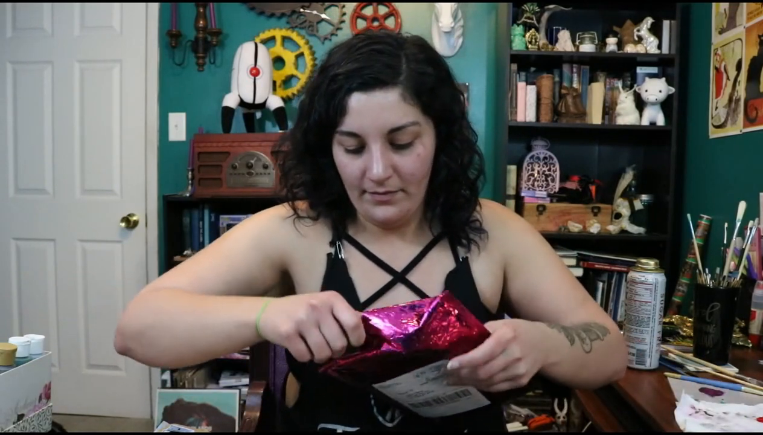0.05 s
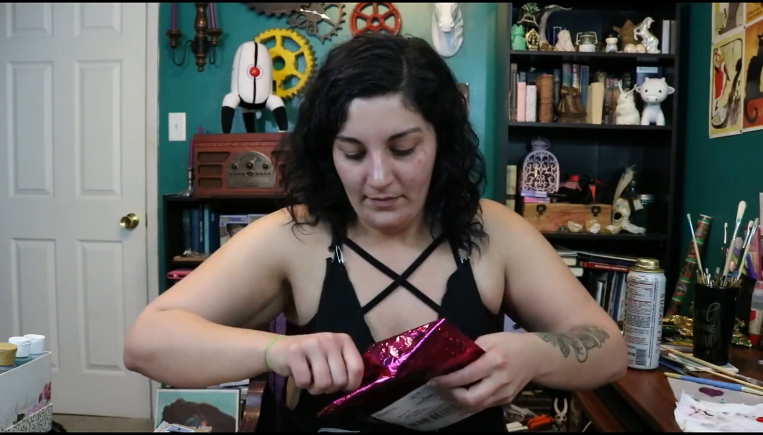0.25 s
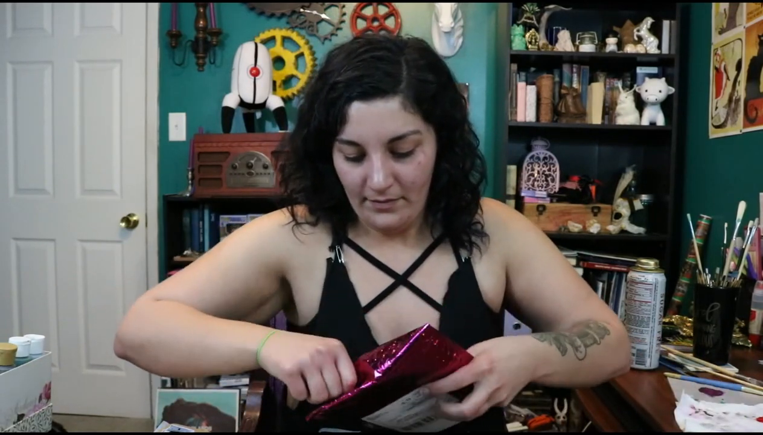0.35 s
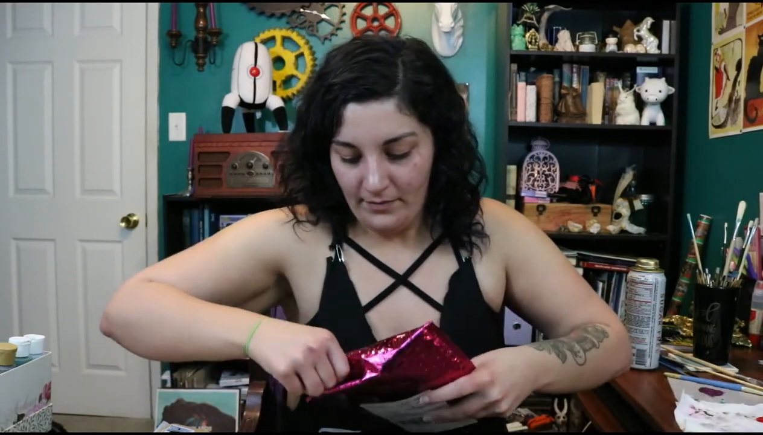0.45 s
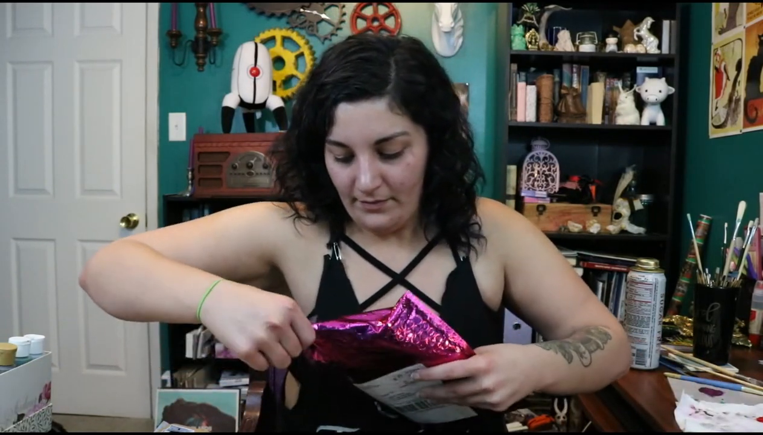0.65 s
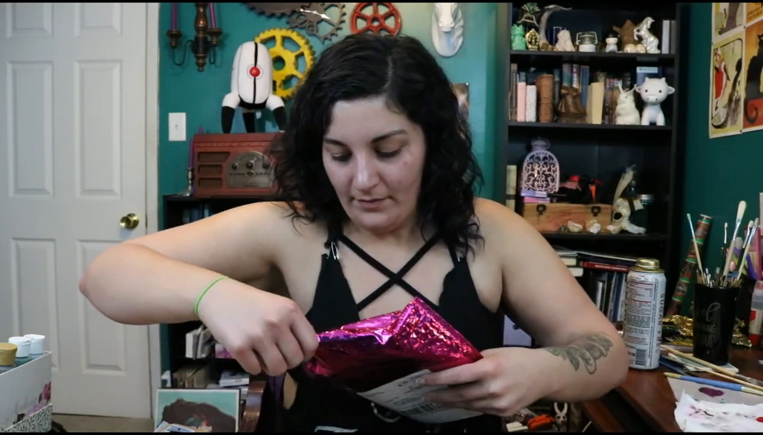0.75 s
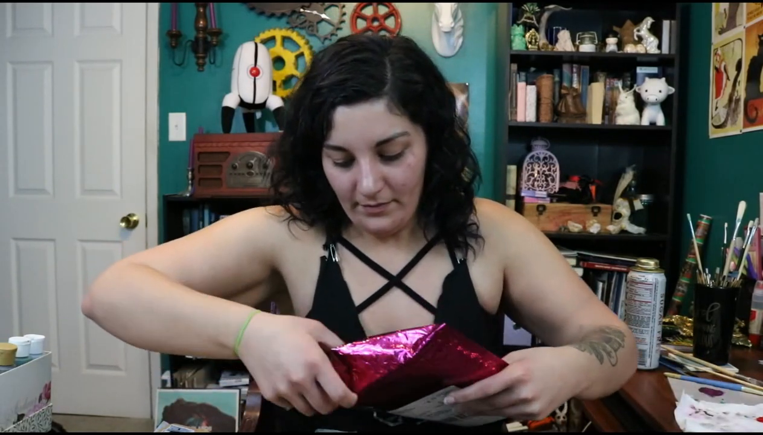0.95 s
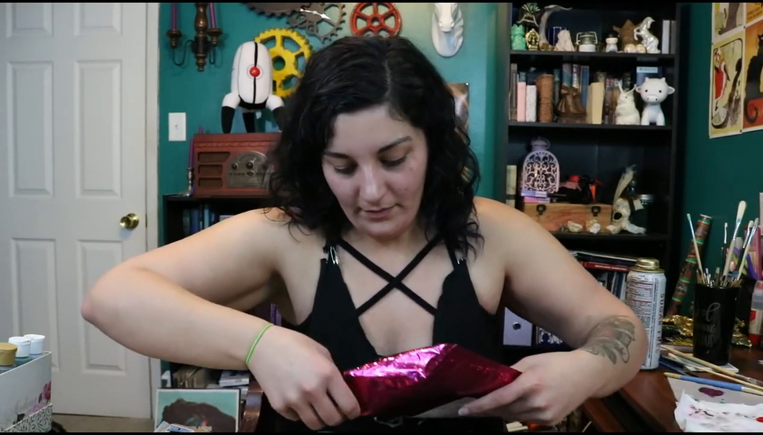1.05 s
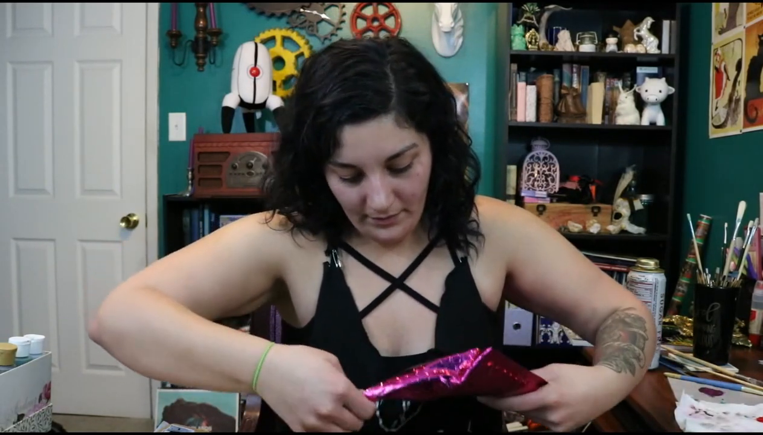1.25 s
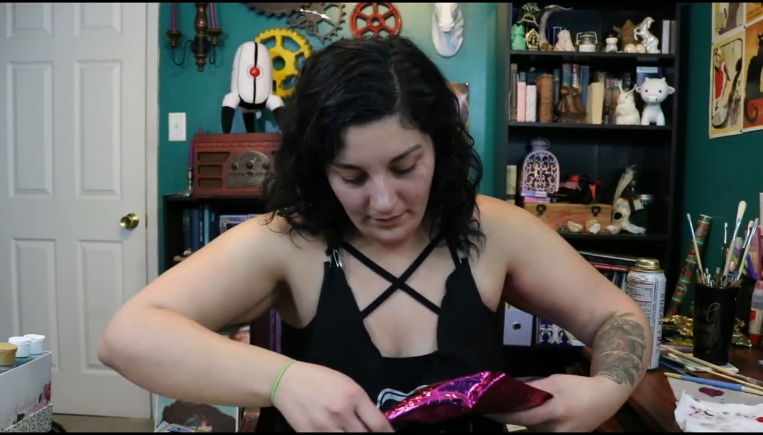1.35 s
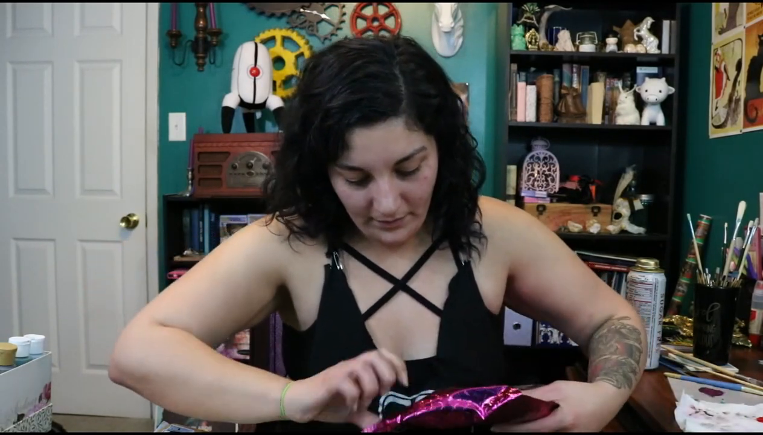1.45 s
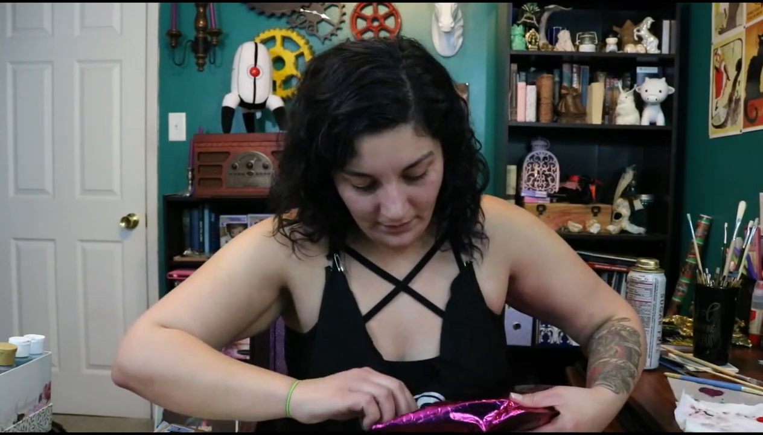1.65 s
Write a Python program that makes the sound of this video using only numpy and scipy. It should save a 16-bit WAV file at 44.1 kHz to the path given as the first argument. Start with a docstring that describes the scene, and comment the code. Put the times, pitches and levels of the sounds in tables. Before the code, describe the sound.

A foil plastic bag crinkles as hands pull it open, with sharp snaps and soft hollow thumps. One hard tug crackles loudest and rings briefly, then lighter crinkling follows, about a metre away in a small quiet room.

```python
"""Tugging open a foil mailer

A foil-coated plastic bag is pulled open by hand, about a metre away in a small room, in stereo.
Creases buckle with sharp snaps over a crinkle of countless tiny ones that follows the hands' effort.
The flexing bag gives soft hollow thumps, and the hardest tug leaves a short ring."""
import sys
import numpy as np
from scipy import signal
from scipy.fft import rfft, irfft, next_fast_len
from scipy.io import wavfile

SR = 44100
rng = np.random.default_rng(int(sys.argv[2]) if len(sys.argv) > 2 else 0)


def waveform_to_disk(signal):
    """Save audio, clipped to [-1, 1], as 16-bit WAV at the path in sys.argv[1]."""
    frames = np.transpose(np.atleast_2d(signal))
    scaled = np.clip(frames, -1, 1) * 32767
    samples = np.round(scaled).astype(np.int16)
    wavfile.write(sys.argv[1], SR, samples)


N = 74970


def amp(db):
    return 10 ** (np.asarray(db) / 20)


def unit_rms(x):
    return x / np.sqrt(np.mean(x ** 2) + 1e-20)


def along(points, hz):
    """Interpolate (Hz, value) points on a log-frequency axis."""
    points_hz, values = np.transpose(points)
    return np.interp(np.log(hz + 1), np.log(points_hz + 1), values)


def band(hz, centre_hz, octaves):
    """Bell on the log-frequency axis."""
    return np.exp(-(np.log2((hz + 1) / centre_hz) / (2 * octaves)) ** 2)


def filtered(x, response):
    """Zero-phase filter with gain response(hz)."""
    n = x.shape[-1]
    size = next_fast_len(n + SR // 4)
    return irfft(rfft(x, size) * response(np.fft.rfftfreq(size, 1 / SR)), size)[..., :n]


def add(out, start_s, x):
    """Mix x into out from start_s."""
    i = max(0, round(start_s * SR))
    n = max(0, min(x.shape[-1], N - i))
    out[..., i:i + n] += x[..., :n]


def pulse(gain, size=1024):
    """Minimum-phase click with spectrum gain(hz)."""
    cepstrum = irfft(np.log(np.maximum(gain(np.fft.rfftfreq(size, 1 / SR)), 1e-4)))
    cepstrum[1:size // 2] *= 2
    cepstrum[size // 2 + 1:] = 0
    return irfft(np.exp(rfft(cepstrum)))


def diffuse_field(noise_pair):
    """Two independent noises become the room's field at two microphones."""
    # Each row: frequency in Hz, left-right correlation.
    coherence = [(100, 0.77), (300, 0.79), (500, 0.97), (900, 0.1), (2000, -0.2), (4000, -0.17),
                 (10000, -0.06)]

    def mid_side_gains(hz):
        angle = np.arccos(np.clip(along(coherence, hz), -1, 1)) / 2
        return np.array([np.cos(angle), np.sin(angle)])

    mid, side = filtered(noise_pair, mid_side_gains)
    return np.array([mid + side, mid - side])


def in_room(x, wet_db=-2, onset_s=0.0017):
    """A short stereo sound plus its own diffuse tail."""
    # Room decay. Each row: frequency in Hz, T60 in seconds.
    t60_s = [(150, 0.45), (450, 0.38), (900, 0.34), (2000, 0.36), (6000, 0.34), (14000, 0.22)]
    hz, t, spectra = signal.stft(rng.standard_normal((2, SR // 2)), SR, nperseg=256)
    decay = amp(-60 * t / along(t60_s, hz)[:, None])
    tail = diffuse_field(signal.istft(spectra * decay, SR, nperseg=256)[1])
    tail *= 1 - np.exp(-(np.arange(tail.shape[1]) / SR / onset_s) ** 2)
    out = signal.fftconvolve(x, tail, axes=1)
    out *= amp(wet_db) * np.linalg.norm(x) / (np.linalg.norm(out) + 1e-12)
    out[:, :x.shape[1]] += x
    return out


def room_tone(rms_db=-53.5):
    """Faint steady air of the room."""
    # Each row: frequency in Hz, relative spectral density in dB.
    spectrum = [(25, -19), (60, -3.5), (90, -9), (135, 1), (200, -3.5), (400, -4.5), (1000, -11),
                (4000, -21.5), (16000, -36)]
    air = diffuse_field(rng.standard_normal((2, N)))
    return amp(rms_db) * unit_rms(filtered(air, lambda hz: amp(along(spectrum, hz))))


def ring(tug_s=0.581, rise_s=0.012, waver_depth=0.18, waver_hz=30):
    """The hardest tug rings the bag; its modes waver as it changes shape."""
    # Each row: mode frequency in Hz, level in dB, T60 in seconds.
    modes = [(415, -30, 0.19), (567, -16.5, 0.34), (673, -36, 0.52), (784.4, -15.5, 0.13), (967, -31, 0.28),
             (1368, -27, 0.31), (1624, -35, 0.28)]
    out, t = np.zeros((2, N)), np.arange(SR // 2) / SR

    def waver():
        drift = filtered(rng.standard_normal(len(t)), lambda hz: np.exp(-(hz / waver_hz) ** 2))
        return waver_depth * unit_rms(drift)

    note = np.zeros(len(t))
    for mode_hz, level_db, t60_s in modes:
        envelope = amp(level_db - 60 * t / t60_s) * (1 + waver())
        note += envelope * np.sin(2 * np.pi * (mode_hz * t + rng.random()) + waver())
    add(out, tug_s, note * (1 - np.exp(-t / rise_s)))
    return out


def thumps(rise_s=0.004, t60_s=0.03, roughness=0.81, trim_db=-1):
    """A whole panel of the bag flips over unevenly and pushes the air inside."""
    # Each row: start in seconds, level in dB, pitch in Hz.
    flips = [(.051, -24.5, 540), (.091, -26, 457), (.12, -25, 484), (.15, -30, 528), (.221, -24.5, 461),
             (.27, -32, 493), (.358, -30, 521), (.39, -29, 490), (.512, -27.5, 530), (.606, -28, 433),
             (.887, -27.5, 560), (.922, -28.5, 506), (.937, -23.5, 487.4), (1.022, -29.5, 550),
             (1.09, -32.5, 413), (1.121, -25, 511), (1.131, -33, 298), (1.143, -23, 517), (1.18, -35, 537),
             (1.365, -34, 523), (1.407, -21, 476), (1.467, -31, 550), (1.537, -31, 530),
             (1.675, -36.5, 460)]
    # Two broad resonances of the hollow bag. Each row: frequency in Hz, gain in dB.
    cavity = [(280, -2), (415, 1), (475, -2.5), (545, 2), (600, -1), (690, -5.5)]
    out, t = np.zeros((2, N)), np.arange(SR // 10) / SR
    envelope = (1 - np.exp(-t / rise_s)) * amp(-60 * t / t60_s)
    for start_s, level_db, pitch_hz in flips:
        uneven = filtered(rng.standard_normal(len(t)), lambda hz: band(hz, pitch_hz, octaves=0.2))
        push = envelope * (np.sin(2 * np.pi * pitch_hz * t) + roughness * unit_rms(uneven))
        push *= amp(level_db + trim_db) / np.abs(push).max()
        add(out, start_s, in_room(np.array([push, push]), wet_db=-3))
    return filtered(out, lambda hz: amp(along(cavity, hz)))


def crinkle(ref_hz=3000, ref_pops_per_s=1100, size_spread_db=5, ref_pan_spread_db=10):
    """Tiny creases pop at random: louder, denser and brighter as the hands press."""
    # Hand effort. Each row: time in seconds, level in dB, base tilt in dB per octave.
    hands = [(0, -39, -2), (.045, -39, 0.5), (.09, -31, -0.5), (.13, -35, -0.5), (0.198, -39, 2),
             (0.269, -36, -1.5), (.32, -40.5, 4), (0.389, -32, -0.5), (.44, -36, 2), (.5, -33, 0.5),
             (.53, -27.5, -1.5), (.548, -20.5, 0.5), (0.579, -22.5, -0.9), (0.609, -20, 0.5),
             (.635, -35, -0.5), (0.704, -30.5, -1.5), (0.746, -45, -2.5), (.8, -44, -1), (.865, -42, -1),
             (.905, -36, -2.5), (.955, -34, 0.5), (1.009, -41.5, -0.5), (1.065, -42, 0),
             (1.125, -31.5, 0.5), (1.17, -31, -1), (1.205, -28.5, 1), (1.25, -39.5, 0), (1.3, -44, 3),
             (1.355, -46.5, 1), (1.385, -35, 0), (1.42, -34, -1), (1.45, -41, -0.5), (1.51, -45, -2),
             (1.572, -39, 1.5), (1.63, -49.5, -1), (1.665, -39.5, -1.5), (1.7, -43.5, 5)]
    # Crease size classes. Each entry: band centre in Hz.
    registers_hz = [130, 300, 700, 1400, 2500, 4200, 7000, 12000]
    # Colour of the film. Each row: frequency in Hz, gain in dB.
    film = [(60, -29.5), (200, -16.5), (330, -10.5), (500, 1), (680, -6), (820, -1.5), (1050, -0.5),
            (1400, 1), (2400, -0.5), (4000, -2), (7500, -6.5), (11000, -13), (16000, -23)]
    times_s, levels_db, tilts = np.transpose(hands)
    t = np.arange(N) / SR
    level_db = np.interp(t, times_s, levels_db)
    effort_db = level_db - level_db.mean()
    tilt_db_per_octave = np.interp(t, times_s, tilts) + 0.0128 * effort_db
    crowding = amp(0.45 * effort_db)
    register = lambda hz, centre_hz: band(hz, centre_hz, octaves=0.49)
    overlap = lambda hz: np.sqrt(sum(register(hz, c) ** 2 for c in registers_hz) + 1e-4)
    direct, click_energy = np.zeros((2, N)), 0
    for centre_hz in registers_hz:
        ratio = centre_hz / ref_hz
        click = pulse(lambda hz: register(hz, centre_hz) / overlap(hz) * amp(along(film, hz)))
        sizes = amp(size_spread_db * np.clip(rng.standard_normal(N), -2, 2)) * rng.choice([-1, 1], N)
        pan_rad = np.arctan(amp(ref_pan_spread_db * ratio * rng.standard_normal(N)))
        pops_per_s = ref_pops_per_s * crowding * ratio ** 0.6  # small, high creases are more numerous
        pops = (rng.random(N) < pops_per_s / SR) * sizes / np.sqrt(crowding)
        pops = unit_rms(pops * np.array([np.cos(pan_rad), np.sin(pan_rad)]))
        pops *= amp(level_db + tilt_db_per_octave * np.log2(ratio))
        direct += signal.fftconvolve(pops, click[None], axes=1)[:, :N]
        click_energy += np.sum(click ** 2)
    out = np.zeros((2, N))
    for part in np.array_split(np.arange(N), 8):  # each stretch gets its own room tail
        add(out, part[0] / SR, in_room(direct[:, part] / np.sqrt(click_energy)))
    return out


def snaps(trim_db=-2, pop_top_hz=9000, size=1024):
    """Each crease pops through in a cycle or two, leaves the film shivering and echoes off the desk."""
    # Each row: start in seconds, level in dB, band centre in Hz, width in octaves.
    creases = [(0.0139, -18, 2750, 0.5), (0.0506, -1.5, 3570, 0.33), (0.0504, -9, 4800, 0.18),
               (0.0508, -12, 1550, 0.34), (0.0584, -13, 2000, 0.82), (0.091, -9.5, 2300, 1.28),
               (0.1483, -22.5, 2260, 0.6), (0.1608, -6.5, 3350, 0.93), (0.167, -14, 6500, 0.69),
               (0.215, -15, 4030, 0.72), (0.2427, -10, 3600, 0.83), (0.2587, -8, 4200, 0.62),
               (0.263, -10.5, 3060, 0.69), (0.366, -13, 4530, 0.61), (0.386, -14, 3370, 0.33),
               (0.4014, -7, 5500, 0.56), (0.4612, -14, 6500, 1), (0.5078, -12, 2440, 0.61),
               (0.527, -7.5, 3370, 0.47), (0.534, -9, 9000, 0.41), (0.5373, -4, 5100, 0.93),
               (0.544, -4, 2300, 0.35), (0.5444, 0, 5900, 0.32), (0.5501, 2.5, 4000, 1.09),
               (0.556, -2, 2160, 0.46), (0.559, 1, 3600, 0.48), (0.5629, -9, 1900, 0.76),
               (0.5645, -12, 1190, 0.43), (.568, -12.5, 2050, 0.35), (0.5911, -6, 2850, 0.55),
               (0.6064, -10, 3800, 0.99), (0.8154, -17, 2860, 0.98), (.8870, -10.5, 7200, 0.66),
               (0.95, -15, 3550, 0.51), (0.956, -14.5, 5400, 0.2), (.982, -17, 3380, 1.1),
               (0.994, -18.5, 3500, 0.69), (1.0225, -8, 4000, 1.1), (1.0948, -19.5, 5040, 0.87),
               (1.122, -24, 2730, 0.47), (1.1794, -2, 3480, 0.44), (1.191, -6, 3800, 1.02),
               (1.195, -13.5, 3900, 0.45), (1.203, -9.5, 5300, 0.36), (1.2553, -8, 6370, 0.56),
               (1.3823, -20, 3230, 0.31), (1.4049, -8.5, 3200, 0.7), (1.4062, -15, 1930, 0.2),
               (1.4064, -6.5, 5130, 0.35), (1.468, -22, 3160, 0.77), (1.5283, -23, 4020, 0.48),
               (1.571, -18, 3470, 0.34), (1.6405, -14.5, 7800, 0.82), (1.6391, -28.5, 1390, 0.18),
               (1.6464, -14, 9500, 0.5), (1.6905, -21.5, 3700, .73)]
    # Colour common to all snaps. Each row: frequency in Hz, gain in dB.
    colour = [(400, 0), (800, -2.5), (1500, -0.5), (2700, 2.5), (5500, 1), (8000, 3), (11000, 0.5),
              (16000, -8)]
    shiver_db, shiver_rise_s, shiver_t60_s, shiver_width = -1.5, 0.00083, 0.0073, 0.78
    desk_db, desk_delay_s = -9, 0.0055
    out, t = np.zeros((2, N)), np.arange(size) / SR
    envelope = (1 - np.exp(-t / shiver_rise_s)) * amp(-60 * t / shiver_t60_s)
    for start_s, level_db, centre_hz, octaves in creases:
        def spectrum(hz):
            slope = np.sqrt(centre_hz / (hz + centre_hz / 2))
            return band(hz, centre_hz, octaves) * slope * amp(along(colour, hz))

        click = pulse(spectrum)
        pop = pulse(lambda hz: spectrum(hz) / np.sqrt(1 + (hz / pop_top_hz) ** 4))
        noise = rng.standard_normal(size) + shiver_width * rng.standard_normal((2, size))
        shiver = signal.fftconvolve(noise * envelope, click[None], axes=1)[:, :size]
        shiver *= amp(shiver_db) * np.linalg.norm(click) / np.linalg.norm(shiver[0])
        snap = (pop + shiver) * amp(level_db + trim_db) / np.abs(click).max()
        add(out, start_s, in_room(snap))
        echo_s = start_s + desk_delay_s * (1 + 0.075 * rng.standard_normal())
        add(out, echo_s, amp(desk_db) * snap)
    return out


def scene():
    """The bag, a little right of centre, over room tone."""
    # Each row: frequency in Hz, left minus right in dB.
    balance = [(200, -1.7), (600, -0.3), (1200, -0.5), (2600, -3), (5000, -1.2), (9000, -0.5), (14000, 0.5)]
    sides = np.array([[0.5], [-0.5]])
    bag = snaps() + crinkle() + thumps() + ring()
    return filtered(bag, lambda hz: amp(along(balance, hz) * sides)) + room_tone()


def record(dry):
    """Clip at full scale, then band-limit."""
    top_hz = 15900
    return filtered(np.clip(dry, -1, 1), lambda hz: hz < top_hz)


dry = scene()
out = record(dry)
waveform_to_disk(out)
```